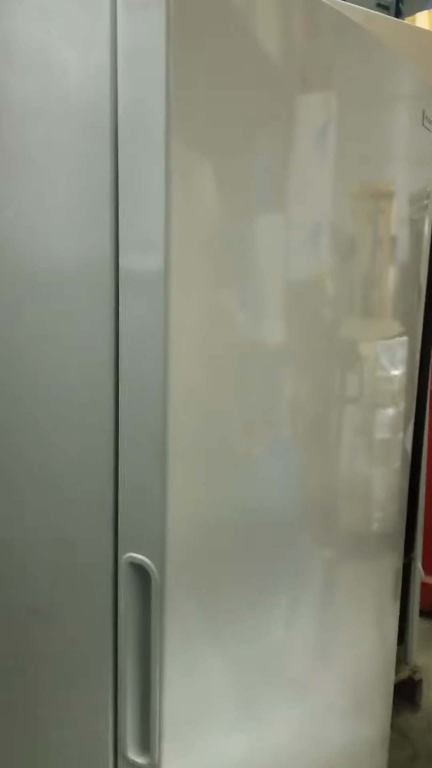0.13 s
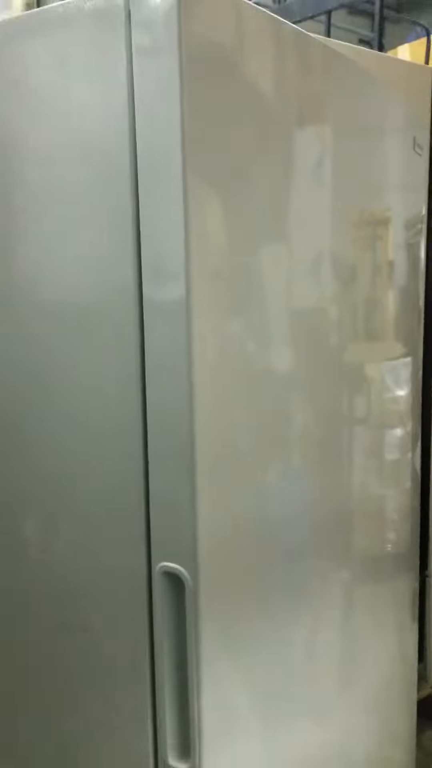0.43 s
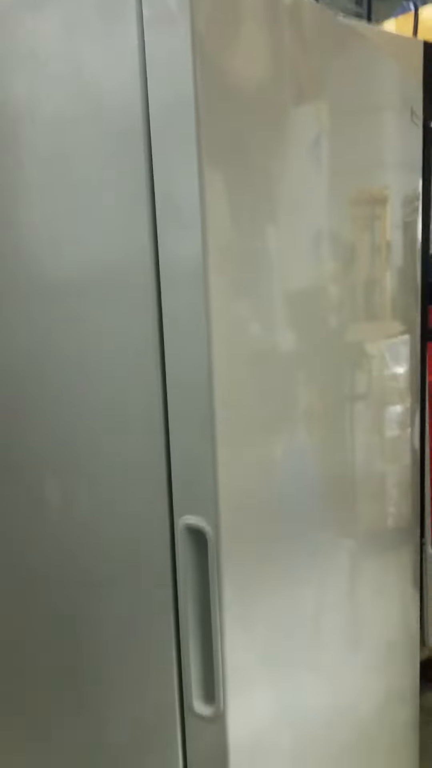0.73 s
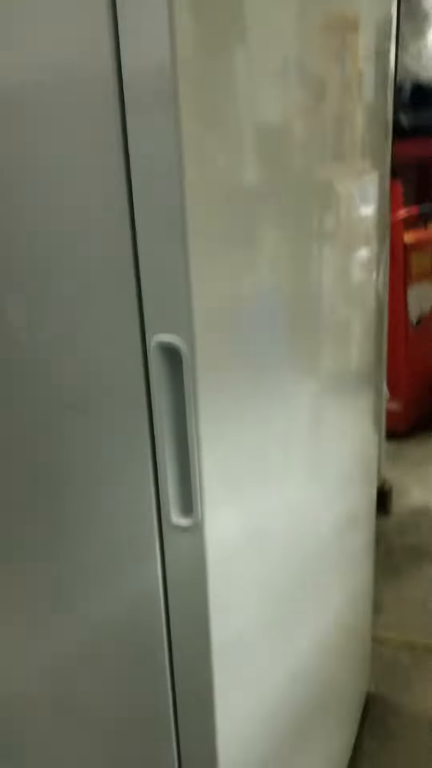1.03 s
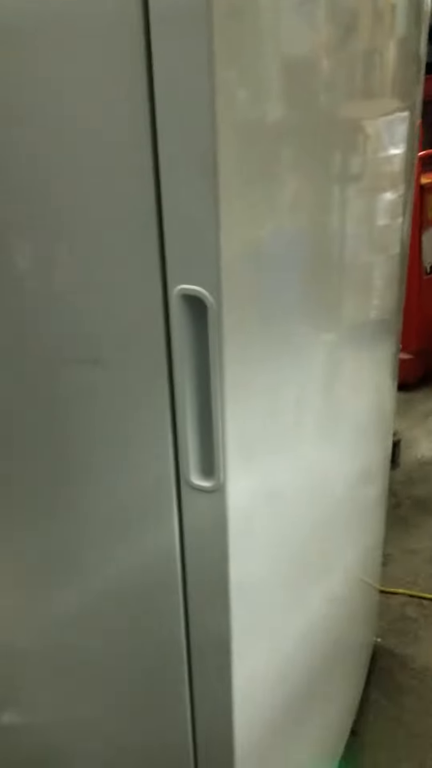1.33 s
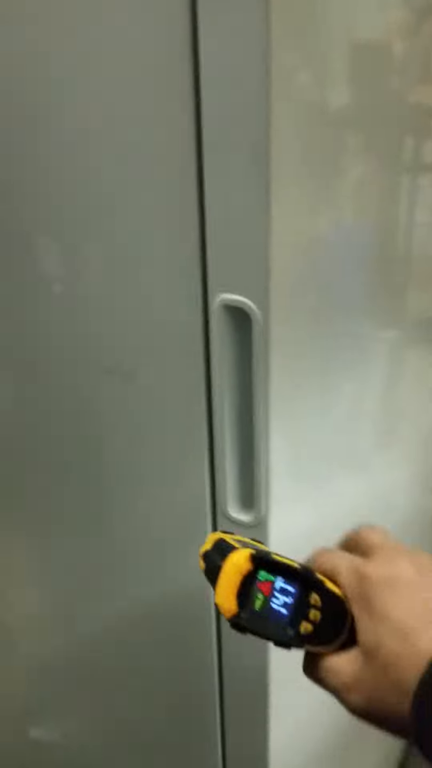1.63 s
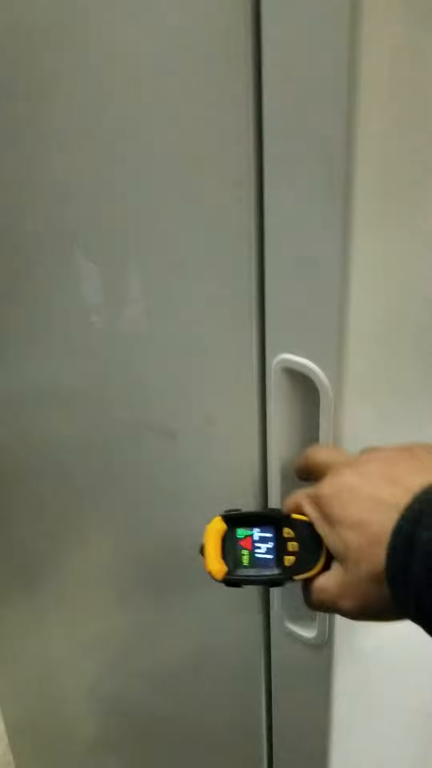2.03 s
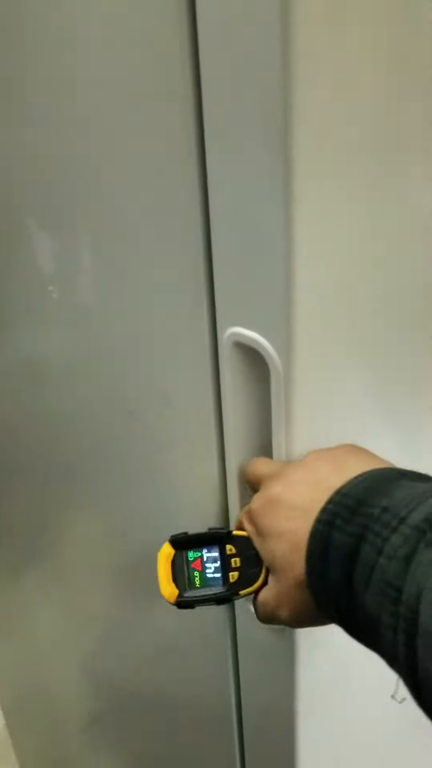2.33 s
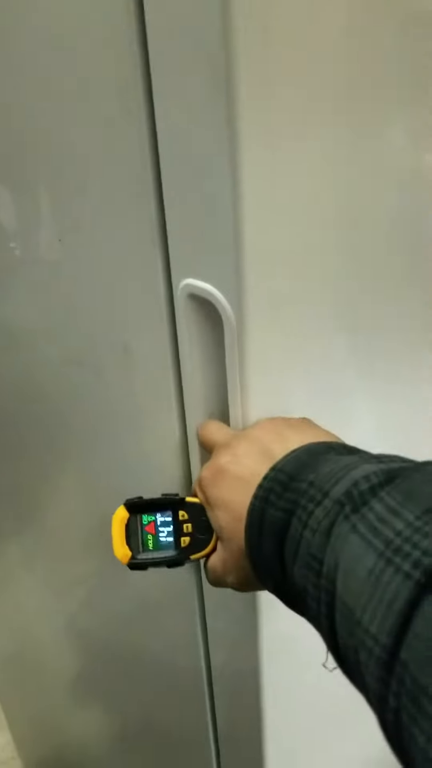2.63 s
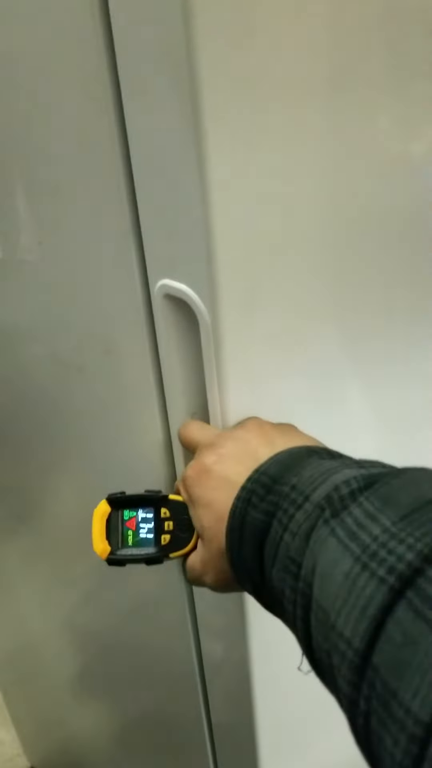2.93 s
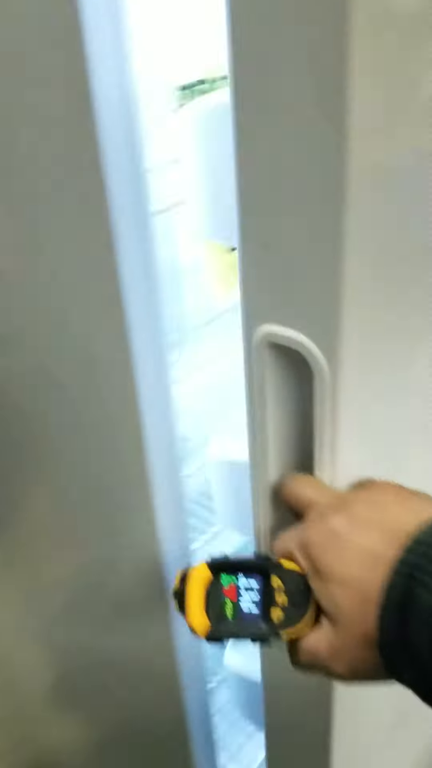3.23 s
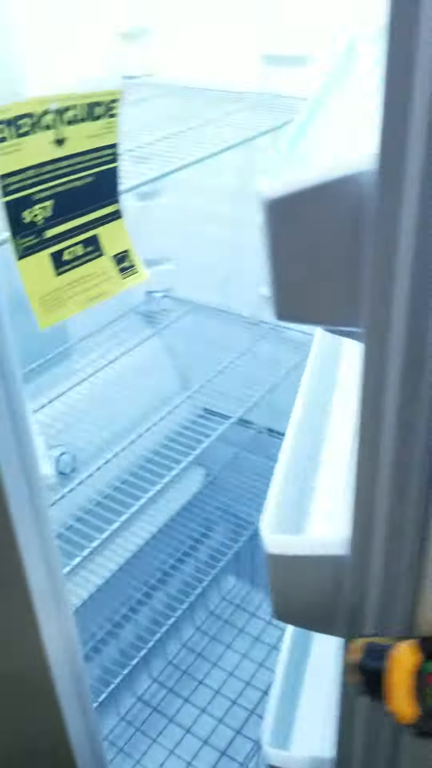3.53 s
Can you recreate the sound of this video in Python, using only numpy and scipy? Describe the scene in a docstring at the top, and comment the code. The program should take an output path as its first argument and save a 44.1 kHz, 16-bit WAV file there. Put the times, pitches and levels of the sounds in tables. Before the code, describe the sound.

A freezer door is opened: after quiet fan hum and sleeve rustle, the handle is knocked, the seal ticks and peels with a thump, then wire shelves rattle. Workshop, handheld phone in stereo.

```python
"""A slow fan drones over mains hum and room air in a workshop; a sleeve rustles near the phone.
The door seal of the upright freezer ticks, peels and lets go with a thump; then the wire shelves rattle.
Hum and fan are sines; air, cloth and rumble are shaped noise; the door is grains and noise shoves
through resonances; the shelves are decaying modes over grainy noise. The two microphones differ in colour."""
import sys
import numpy as np
from scipy import signal
from scipy.fft import rfft, irfft, next_fast_len
from scipy.io import wavfile
from scipy.ndimage import map_coordinates

SR = 44100
rng = np.random.default_rng(int(sys.argv[2]) if len(sys.argv) > 2 else 0)


def to_wav(sig):
    """Store sig (one row per channel, or 1-D mono) as 16-bit WAV at the path in sys.argv[1].

    Samples outside -1..1 are clipped; the rate is SR.
    """
    pcm = np.clip(np.atleast_2d(sig), -1, 1) * 32767
    pcm = np.round(pcm).astype(np.int16)
    wavfile.write(sys.argv[1], SR, pcm.T)  # frames by channels


def field_ratio(decibels):
    """Amplitude ratio for a level in dB (20 dB per decade); scalars and array-likes work."""
    return 10 ** (np.asarray(decibels, dtype=float) / 20)


N = 163170
T = np.arange(SR // 3) / SR  # clock of one short event, s

# Levels of door, shelves, ticks and steps are ahead of room and microphones.
# door seal peeling: t/s, deep panel/dB, upper panel/dB, crackle/dB, crackle treble/dB
PEEL = [(2.801, -48, -59, -90, -89), (2.82, -56, -52, -54, -75), (2.852, -70, -47.5, -56.5, -68),
        (2.87, -65, -51, -54.5, -73), (2.89, -64, -63, -62, -66), (2.91, -50, -49, -52.5, -59),
        (2.922, -55.5, -40.5, -50.5, -73), (2.941, -35.5, -35, -46, -46), (2.963, -44, -39.5, -59, -73),
        (2.978, -45, -42, -58, -60), (2.99, -33, -47, -48, -61), (3.01, -38.5, -36.5, -46, -74),
        (3.029, -45, -52, -62, -61), (3.065, -39, -52, -57, -62), (3.09, -68, -79, -74, -72),
        (3.16, -68, -81, -60.5, -75), (3.22, -74, -93, -76, -85)]
# door panel resonances: f/Hz, width/Hz, level/dB
PANEL_MODES = [(87, 28, -2.5), (173.5, 20, -0.5), (253, 79, -9.5), (335, 56, -0.5), (450, 65, -3),
               (578, 64, -7.5), (718, 41, -4.5), (828, 146, -15), (1220, 163, -16.5), (2040, 840, -33),
               (2860, 220, -27)]
# crackle colour: f/Hz, level/dB
CRACKLE_COLOUR = [(800, -17), (1300, 2.5), (2000, 1), (2900, -2), (3700, 1.5), (4400, -4), (5500, -36)]
# treble colour of the crackle: f/Hz, level/dB
FIZZ_COLOUR = [(3500, -30), (4800, -1), (6500, -0.5), (9000, 2), (13000, -8)]
# jolts of the door: t/s, body/dB, snap/dB, t60/s, tilt/dB per octave
JOLTS = [(2.849, -49, -70, 0.074, 2.5), (2.884, -45, -70, .05, 0), (2.907, -52, -66, 0.064, 3),
         (2.927, -42.5, -64, 0.072, 2), (2.941, -40, -57, .06, 3.5), (2.951, -41.5, -60, 0.065, 2.5),
         (2.976, -46.5, -58, 0.071, 2), (2.9951, -36, -26, 0.17, -3), (3.02, -44, -50, 0.063, 0.5),
         (3.293, -48.5, -78, 0.33, -2)]
# hand knocks on the handle: t/s, body/dB, snap/dB
KNOCKS = [(2.679, -42.5, -39), (2.7, -49, -56), (2.715, -55.5, -60), (2.755, -45, -63)]
# handle resonances: f/Hz, width/Hz, level/dB
HANDLE_MODES = [(243, 37, -3), (390, 97, -1), (528, 44, 5), (690, 100, -2), (800, 60, 1.5), (930, 63, 1),
                (2230, 900, -20.5)]
# colour of the bright snap on a blow: f/Hz, level/dB
SNAP_COLOUR = [(1000, -23), (2500, -5), (4000, 2), (6000, -1), (9000, 1), (14000, -0.5)]
# shelf rattles: t/s, ring/dB, crack/dB, clatter t60/s, best-rung f/Hz, loss away from it/dB per octave
RATTLES = [(3.155, -60, -55, 0.13, 2500, 7), (3.2571, -53.5, -44.5, 1, 2200, 5),
           (3.2945, -39.5, -51, 0.033, 2100, 32), (3.4237, -35, -27, 0.18, 1820, 2.5),
           (3.443, -42.5, -46, 0.14, 2600, 8), (3.435, -38.5, -29, 0.21, 504, 9),
           (3.451, -42, -47, 0.16, 1250, 5), (3.47, -42, -51, 0.14, 1300, 28),
           (3.486, -53, -46, 0.1, 1320, 7), (3.5308, -44, -34.5, 0.05, 2700, 2),
           (3.548, -59, -47, 0.098, 2500, 0), (3.597, -49, -45, 0.12, 1300, 4.5),
           (3.62, -55.5, -40, 0.13, 1800, 1)]
# shelf wire modes: f/Hz, level/dB, t60/s
SHELF_MODES = [(264, 2.5, 0.23), (352.5, 0.5, 0.13), (607, -2.5, 0.025), (983, -2.5, 0.1), (1139, 3, 0.072),
               (1298, -4, 0.079), (1425, -9, 0.063), (1800, -16, 0.15), (1996, -11, .07),
               (2280, 2.5, 0.022), (2545, -2.5, 0.043), (2867, 1, 0.028), (3260, -5.5, 0.072),
               (3720, -17, 0.082), (4016, -15, 0.1)]
# clatter colour: f/Hz, level/dB
CLATTER_COLOUR = [(200, -9), (600, 8), (1200, 11.5), (1700, 3), (2500, 4.5), (4000, 3.5), (6000, -7),
                  (9000, -11), (14000, -17)]
# partials of a shelf crack: f/Hz
CRACK_HZ = (2180, 2940, 3700)
# sticky ticks of the seal: t/s, level/dB, f/Hz
SEAL_TICKS = [(1.549, -40.5, 5530), (2.477, -45.5, 5400), (2.523, -46, 5000), (2.540, -36, 9800),
              (2.602, -37, 5360), (2.607, -44, 12000), (2.616, -41.5, 4260), (2.642, -44, 5800),
              (2.668, -51, 4970), (2.744, -46, 4670), (2.8183, -32.5, 3440), (2.878, -44, 5500),
              (2.899, -41, 6900), (2.902, -33, 8160), (2.9275, -47, 2860), (2.946, -28, 2900),
              (3.022, -36, 2080), (2.978, -40, 12000)]
# footfalls: t of the peak/s, level/dB, rise/s, t60/s, tilt/dB per octave
STEPS = [(.765, -51, .13, .4, -1), (1.538, -50, .007, .08, -4)]
# sole colour: f/Hz, level/dB
SOLE_COLOUR = [(150, -14), (320, 6.5), (600, 0), (1000, -2.5), (2200, -10.5), (4000, -19), (8000, -43)]
# reverberation: f/Hz, t60/s
ROOM_T60 = [(200, 0.054), (2000, 0.29), (10000, 0.1)]
# microphone colours: f/Hz, level/dB
MIC_LEFT = [(200, -0.5), (500, -3.5), (1200, 0), (2000, 3), (3000, 5.5), (4000, 7.5), (5000, -2),
            (6600, -18), (7100, -61), (15000, -60)]
MIC_RIGHT = [(200, 1.5), (500, 3), (1200, -2), (1700, 3), (2100, 2), (3600, -2.5), (6200, 9.5),
             (8000, -4.5), (12500, 6.5), (15500, -7)]
# cloth rub: t/s, lower rustle/dB, upper rustle/dB (right side)
SLEEVE = [(0, -79, -90), (.3, -82, -78), (.33, -66, -64), (.43, -65, -65), (.49, -75, -72),
          (.505, -74, -73), (.515, -69, -61), (.57, -67.5, -67), (.66, -69, -67), (.78, -74, -71),
          (.95, -72, -76), (.97, -68, -70), (1.03, -64.5, -61), (1.065, -62, -64), (1.09, -60.5, -52.5),
          (1.13, -67.5, -69), (1.2, -70.5, -66), (1.38, -65, -63), (1.5, -64.5, -63), (1.66, -64, -63.5),
          (1.8, -65, -65), (1.92, -59, -65), (1.97, -64, -70), (2.03, -66, -72), (2.06, -77, -77.5),
          (2.23, -70.5, -70.5), (2.42, -65, -68), (2.66, -74, -73), (2.75, -66.5, -69), (3.05, -66, -65),
          (3.14, -63.5, -68), (3.161, -62, -60.5), (3.259, -68, -73), (3.55, -63.5, -67), (3.7, -71, -76)]
# colours of the lower and upper rustle: f/Hz, level/dB
CLOTH_LOWER = [(1500, -21), (3000, -14.5), (4300, -12.5), (5800, -2.5), (7000, -15.5), (8000, -17.5),
               (10000, -47)]
CLOTH_UPPER = [(6500, -58), (9200, -15), (10500, -9), (12500, -0.5), (14200, -8), (15800, -15.5)]
# fabric ticks: t/s, level/dB (right side), f/Hz
CLOTH_TICKS = [(.326, -40, 12000), (.353, -43, 6000), (.513, -38, 12400), (.552, -46, 12000),
               (.62, -44, 11000), (.657, -39, 12500), (.733, -41, 12000), (.835, -49, 11500),
               (.962, -44, 11900), (1.74, -44, 4570), (1.935, -38, 5660)]
# low bumps while walking: t/s, level/dB
RUMBLE = [(.7, -70), (.86, -43.5), (.95, -43.5), (1.0, -49), (1.09, -41), (1.15, -53.5), (1.21, -40.5),
          (1.3, -60), (1.42, -77), (1.5, -82)]
# rumble colour: f/Hz, level/dB
RUMBLE_COLOUR = [(30, -19.5), (60, 6), (110, 3), (160, -10.5), (250, -7), (500, -78)]
# fan: t/s, f of the 12th order/Hz, level/dB, 8th order over that level/dB
FAN = [(0, 107, -47, -3), (.8, 108, -49, -3.5), (1.1, 108.4, -47, -5), (1.25, 108, -47, -3.5),
       (1.37, 107.5, -44, -12), (1.5, 107.1, -46.5, -1), (2.1, 107.1, -45, -3.5), (2.9, 107.1, -44, -4.5),
       (3.02, 107, -44.5, -2), (3.16, 107, -46, -4), (3.3, 107.5, -44, -3.5), (3.55, 108.5, -46, 4.5),
       (3.7, 108.8, -46.5, 1.5)]
# wavering shaft orders: multiple of shaft speed, level re fan/dB, waver/dB
ORDERS = [(3.97, -9.5, 1), (12, -0.5, -0.54), (12.98, -10.5, -2), (16.07, -17.5, 2), (17.01, -14, -4.5),
          (23.24, -13.5, 2), (28.16, -23, -3.5)]
# mains hum: f/Hz, level/dB rms before waver
MAINS = [(240, -54), (360, -72.5), (480, -75.5)]
# relative air spectrum at each microphone: f/Hz, level/dB
AIR_LEFT = [(20, -32), (40, 2), (90, -2), (250, -5), (600, -26), (1000, -32), (1600, -33), (2200, -30),
            (3000, -16), (3800, -13.5), (4500, -30), (5500, -44.5), (7500, -46), (13000, -44.5)]
AIR_RIGHT = [(20, -14), (40, -8), (90, -8), (250, -2.5), (700, -21.5), (1300, -34.5), (1900, -33),
             (2500, -39), (4300, -37), (6000, -37), (7000, -53), (8700, -49), (12500, -45), (15500, -55)]
# left-right likeness of the air ahead of its spectra: f/Hz, correlation
ALIKE = [(60, 0.91), (290, 0.91), (640, 0.38), (1400, 0.36), (3000, 0.051)]
# low-mid swell of the air: t/s, level/dB (-70 leaves it unchanged)
SWELL = [(0, -63.5), (.15, -68.5), (.4, -78), (.6, -61.5), (.9, -66), (1.3, -70.5), (1.6, -64.5),
         (1.8, -65.5), (1.85, -62), (2.07, -61.5), (2.15, -65.5), (2.3, -63.5), (2.6, -65.5), (3.2, -60),
         (3.7, -60)]


def unit(x):
    """Scale to rms 1."""
    return x / np.sqrt(np.mean(x ** 2) + 1e-20)


def along(points, hz):
    """Interpolate (Hz, value) points on a log frequency axis."""
    f, v = np.transpose(points)
    return np.interp(np.log(hz + 1), np.log(f + 1), v)


def curves(rows):
    """One value per sample for each column after the time."""
    s, *cols = np.transpose(rows)
    return [np.interp(np.arange(N) / SR, s, c) for c in cols]


def wobble(knots_per_s):
    """A smooth random curve."""
    knots = rng.standard_normal(int(N * knots_per_s / SR) + 4)
    return map_coordinates(knots, [np.arange(N) * knots_per_s / SR])


def filtered(x, response):
    """Apply a complex response of frequency."""
    m = next_fast_len(x.shape[-1] + 8192)
    spectrum = rfft(x, m) * response(np.fft.rfftfreq(m, 1 / SR))
    return irfft(spectrum, m)[..., :x.shape[-1]]


def coloured(x, colour):
    """Filter by a (Hz, dB) colour, then scale to rms 1."""
    return unit(filtered(x, lambda hz: field_ratio(along(colour, hz))))


def grains(per_s, spread_db, channels=1):
    """Sparse impulses of uneven size, mostly either sign alike."""
    shape = (channels, N)
    chance = rng.random(shape)
    size_db = spread_db * np.minimum(rng.exponential(size=shape), 2.5)
    sign = rng.uniform(-0.85, 1, shape)
    return (chance < per_s / SR) * field_ratio(size_db) * sign


def add(track, s, sound):
    """Mix a sound into the track at a time in s."""
    part = track[..., round(s * SR):][..., :sound.shape[-1]]
    part += sound[..., :part.shape[-1]]


def resonant(modes):
    """Causal sum of band resonances, alternating in sign."""
    def response(f):
        return sum((-1) ** k * field_ratio(db) * 1j * f * width / (c * c - f * f + 1j * f * width)
                   for k, (c, width, db) in enumerate(modes))
    return response


def blow(response, db, snap_db, t60_s):
    """A short noise shove rings a body; a bright snap rides on it."""
    body = filtered(rng.standard_normal(len(T)) * field_ratio(-60 * T / t60_s), response)
    snap_t60_s = 0.038
    snap = coloured(rng.standard_normal((2, len(T))), SNAP_COLOUR) * field_ratio(-60 * T / snap_t60_s)
    onset_rms = np.std(body[:SR // 30])
    return field_ratio(db) * body / onset_rms + field_ratio(snap_db) * snap


def peel():
    """Stick-slip grains shake the panel and crackle along the seal."""
    grains_per_s, spread_db, split_hz = 900, 1, 400
    silent = (-100, -100, -100, -100)
    rows = [(PEEL[0][0] - .01, *silent), *PEEL, (PEEL[-1][0] + .05, *silent)]
    deep_db, upper_db, crackle_db, fizz_db = curves(rows)
    slips = grains(grains_per_s, spread_db)
    deep = filtered(slips, resonant([m for m in PANEL_MODES if m[0] < split_hz]))
    upper = filtered(slips, resonant([m for m in PANEL_MODES if m[0] > split_hz]))
    panel = field_ratio(deep_db) * unit(deep) + field_ratio(upper_db) * unit(upper)
    pops = grains(grains_per_s, spread_db, channels=2)
    crackle = field_ratio(crackle_db) * coloured(pops, CRACKLE_COLOUR)
    fizz = field_ratio(fizz_db) * coloured(pops, FIZZ_COLOUR)
    return panel + crackle + fizz


def door():
    """The peeling seal, with jolts ringing the panel and knocks ringing the handle."""
    out = peel()
    panel, handle = resonant(PANEL_MODES), resonant(HANDLE_MODES)
    for s, db, snap_db, t60_s, tilt_db in JOLTS:
        def tilted(f):
            return panel(f) * field_ratio(tilt_db * np.log2((f + 50) / 500))
        add(out, s, blow(tilted, db, snap_db, t60_s))
    for s, db, snap_db in KNOCKS:
        add(out, s, blow(handle, db, snap_db, t60_s=0.085))
    return out


def wire_ring(best_hz, loss_db):
    """Decaying wire modes, slightly scattered, strongest near the struck pitch."""
    scatter_db, detune, rise_s = 2, 0.0099, 0.00043
    ring = 0
    for f, db, t60_s in SHELF_MODES:
        level_db = db + rng.normal(0, scatter_db) - loss_db * abs(np.log2(f / best_hz))
        mode_hz = f * (1 + detune * rng.normal())
        ring = ring + field_ratio(level_db - 60 * T / t60_s) * np.sin(2 * np.pi * mode_hz * T)
    return ring * (1 - np.exp(-T / rise_s))


def clatter_noise(best_hz, loss_db):
    """Noise in uneven 60-sample grains, losing half as much per octave as the ring."""
    grain_db = 2.7 * rng.standard_normal(len(T) // 60 + 1).repeat(60)[:len(T)]
    colour = [(hz, db - loss_db / 2 * abs(np.log2(hz / best_hz))) for hz, db in CLATTER_COLOUR]
    return coloured(rng.standard_normal((2, len(T))) * field_ratio(grain_db), colour)


def shelves():
    """Each knock cracks and rings the wires near its own pitch, over a grainy clatter."""
    clatter_db, crack_t60_s = -1.5, 0.0063
    out = np.zeros((2, N))
    for s, db, crack_db, t60_s, best_hz, loss_db in RATTLES:
        ring = wire_ring(best_hz, loss_db)
        noise = clatter_noise(best_hz, loss_db)
        clatter = noise * field_ratio(clatter_db - 60 * T / t60_s)
        crack = sum(np.sin(2 * np.pi * hz * T) for hz in CRACK_HZ) / 2 + 0.17 * noise
        add(out, s, field_ratio(db) * (ring + clatter) + crack * field_ratio(crack_db - 60 * T / crack_t60_s))
    return out


def ticks(rows):
    """Tiny bright snaps: a decaying sine with a little noise."""
    cycles_to_60_db = 10.7
    out, t = np.zeros(N), T[:900]
    for s, db, hz in rows:
        tone = np.sin(2 * np.pi * hz * t) + 0.075 * rng.standard_normal(len(t))
        add(out, s, field_ratio(db - 60 * t * hz / cycles_to_60_db) * tone)
    return out


def sleeve():
    """Fine grainy cloth noise in two bands and a few ticks next to the right microphone."""
    rub = 0
    for db, colour in zip(curves(SLEEVE), (CLOTH_LOWER, CLOTH_UPPER)):
        fibres = rng.standard_normal(N) + .4 * unit(grains(720, 2.2))
        rub = rub + field_ratio(db + 1.6 * wobble(67)) * coloured(fibres, colour)
    return (rub + ticks(CLOTH_TICKS)) * field_ratio([[-30], [0]])


def steps():
    """Soft scuffs on the floor: coloured noise that swells and fades."""
    out, t = np.zeros(N), np.arange(SR // 2) / SR
    for s, db, rise_s, t60_s, tilt_db in STEPS:
        rise = np.sin(np.pi / 2 * t / rise_s) ** 2
        swell = np.where(t < rise_s, rise, field_ratio(-60 * (t - rise_s) / t60_s))
        colour = [(hz, d + tilt_db * np.log2(hz / 500)) for hz, d in SOLE_COLOUR]
        add(out, s - rise_s, field_ratio(db) * swell * coloured(rng.standard_normal(len(t)), colour))
    return out


def rumble():
    """Low noise bumps, nearly alike on both sides."""
    rows = [(0, -120), *RUMBLE, (RUMBLE[-1][0] + .05, -120)]
    noise = rng.standard_normal(N) + 0.5 * rng.standard_normal((2, N))
    return field_ratio(curves(rows)[0]) * coloured(noise, RUMBLE_COLOUR)


def fan_orders():
    """Sines at multiples of the shaft angle; all but the 8th order waver on their own."""
    waver_limit, eighth_multiple = 1.5, 8.05
    hz, db, eighth_db = curves(FAN)
    shaft = 2 * np.pi * np.cumsum(hz / 12) / SR
    fan = field_ratio(eighth_db) * np.sin(eighth_multiple * shaft)
    for multiple, order_db, waver_db in ORDERS:
        waver = waver_db * np.clip(wobble(5.12), -waver_limit, waver_limit)
        phase = 2 * np.pi * rng.random() + 0.13 * rng.standard_normal((2, 1))  # sides differ a little
        fan = fan + field_ratio(order_db + waver) * np.sin(multiple * shaft + phase)
    return field_ratio(db) * fan


def mains_hum():
    """Mains harmonics as sines, each wavering in level."""
    t = np.arange(N) / SR
    return sum(field_ratio(db + wobble(4.06)) * np.sin(2 * np.pi * hz * t) for hz, db in MAINS)


def drone():
    """Fan and mains sines, scaled from rms to peak."""
    return np.sqrt(2) * (fan_orders() + mains_hum())


def air():
    """Room noise, alike in the bass; its low mids rise and fall."""
    left_rms_db, swell_ref_db, lo_hz, hi_hz = -50, -70, 396, 1110

    def shares(hz):
        angle = np.arccos(np.clip(along(ALIKE, hz), -1, 1)) / 2
        return np.array([np.cos(angle), np.sin(angle)])

    common, apart = filtered(rng.standard_normal((2, N)), shares)
    pair = np.array([common + apart, common - apart])
    pair = filtered(pair, lambda hz: field_ratio([along(AIR_LEFT, hz), along(AIR_RIGHT, hz)]))
    pair = field_ratio(left_rms_db) * pair / np.std(pair[0])
    low_mids = filtered(pair, lambda hz: 1 / (1 + (lo_hz / (hz + 1)) ** 4) / (1 + (hz / hi_hz) ** 6))
    return pair + low_mids * (field_ratio(curves(SWELL)[0] - swell_ref_db) - 1)


def room(x):
    """Convolve with a noise tail in which each frequency dies at its own speed."""
    hz, t, z = signal.stft(rng.standard_normal((2, SR // 2)), SR, nperseg=256)
    decay = field_ratio(-60 * t / along(ROOM_T60, hz)[:, None])
    tail = signal.istft(z * decay, SR, nperseg=256)[1]
    late = np.pad(x, (200, 0))[None]  # predelay, samples
    return signal.fftconvolve(late, tail / np.linalg.norm(tail[0]), axes=1)[:, :N]


def ports(x):
    """The colour of each microphone and the lag of the left one."""
    left_lag_s = .00004

    def response(hz):
        colour = field_ratio([along(MIC_LEFT, hz), along(MIC_RIGHT, hz)])
        return colour * np.exp(-2j * np.pi * hz * [[left_lag_s], [0]])

    return filtered(x, response)


def scene():
    """Near sounds pass room and ports; the other layers are set per microphone."""
    room_db = -5.5
    near = door() + shelves() + ticks(SEAL_TICKS) * field_ratio([[-4], [2]]) + steps()
    heard = ports(near + field_ratio(room_db) * room(near.mean(axis=0)))
    return heard + sleeve() + rumble() + drone() + air()


def low_pass(x):
    """Removes everything above the highest recorded frequency."""
    return signal.sosfilt(signal.butter(12, 16490, fs=SR, output="sos"), x)


def record(dry):
    """The phone's band limit: 28 dB down from 15850 Hz up."""
    mix = filtered(dry, lambda hz: np.where(hz < 15850, 1, field_ratio(-28)))
    return low_pass(mix)


dry = scene()
out = record(dry)
to_wav(out)
```